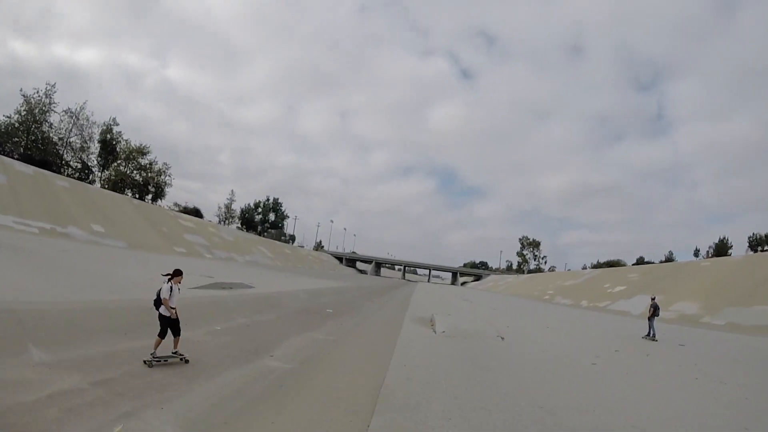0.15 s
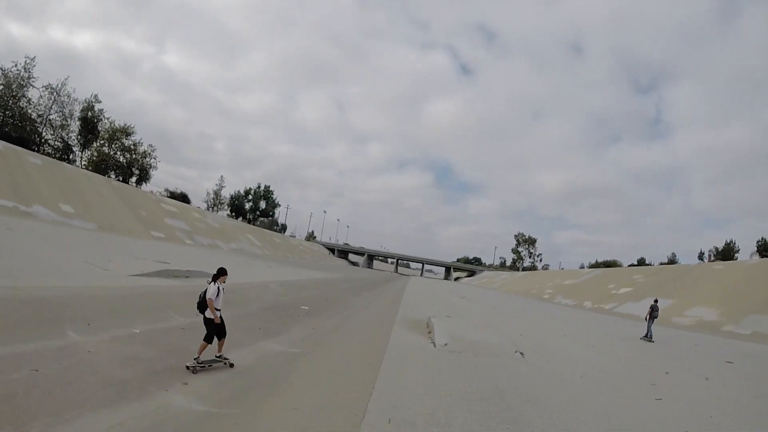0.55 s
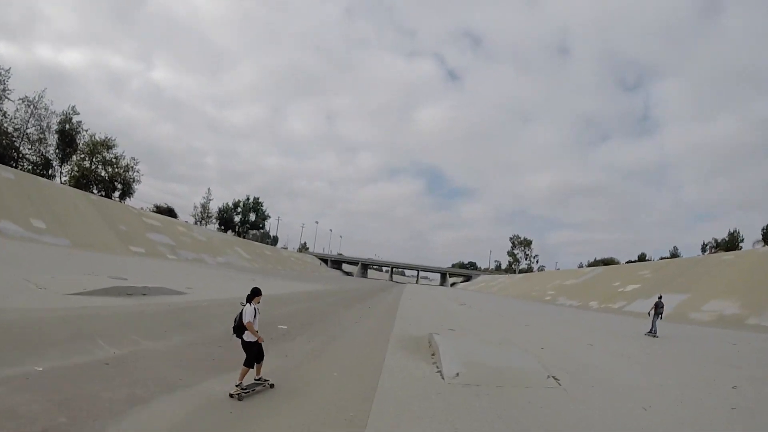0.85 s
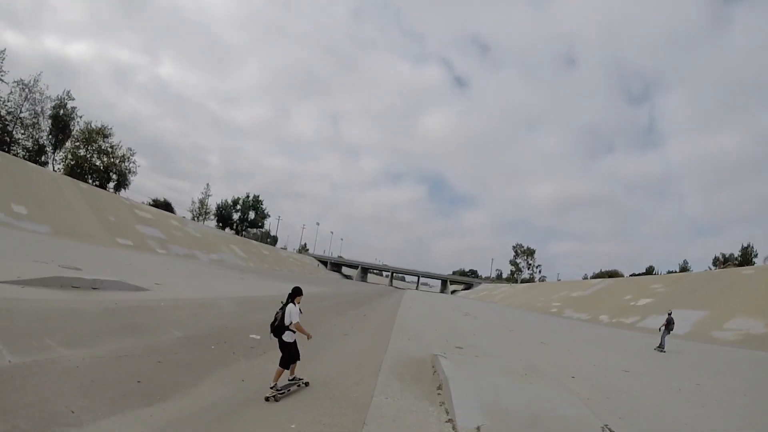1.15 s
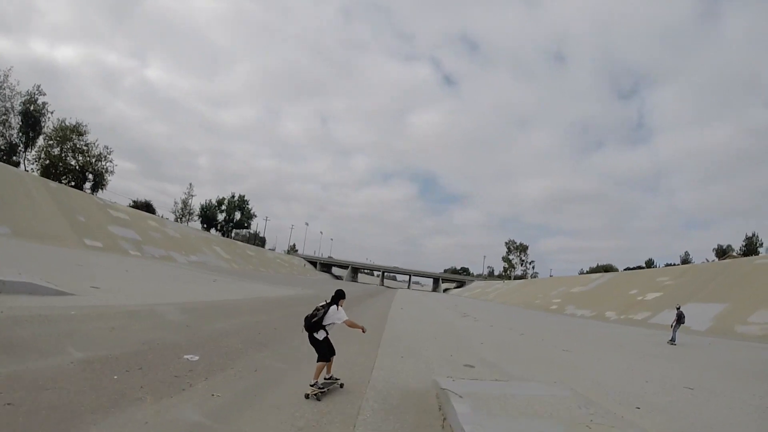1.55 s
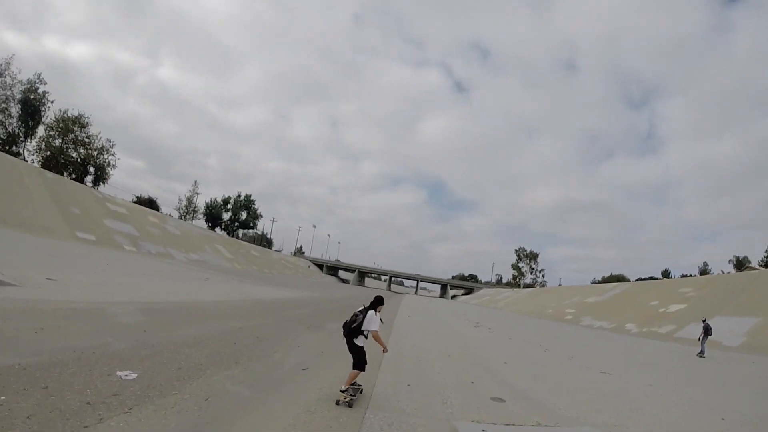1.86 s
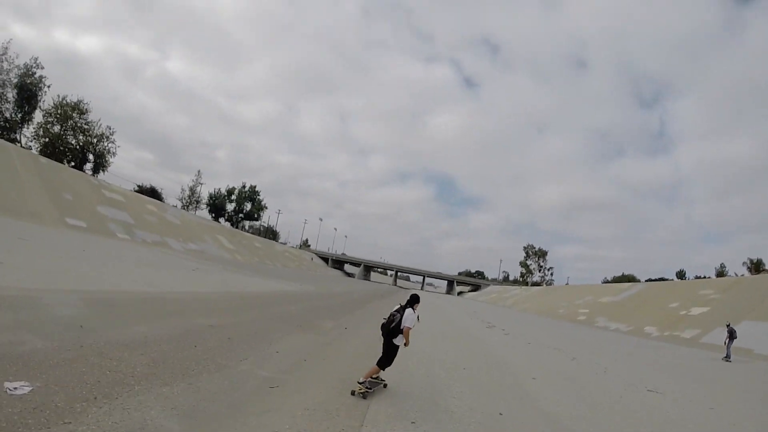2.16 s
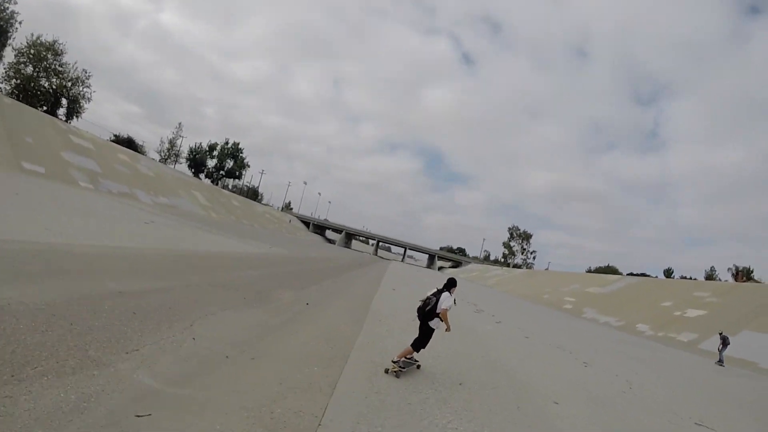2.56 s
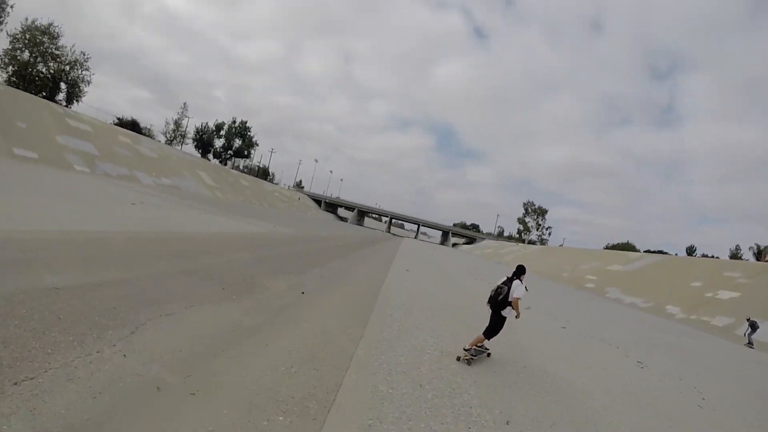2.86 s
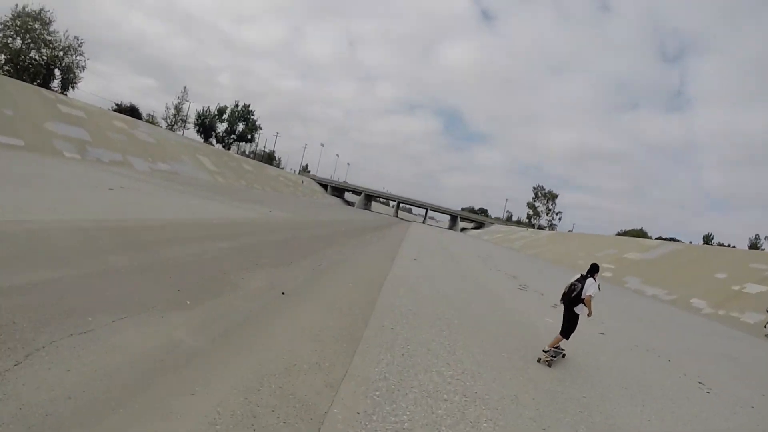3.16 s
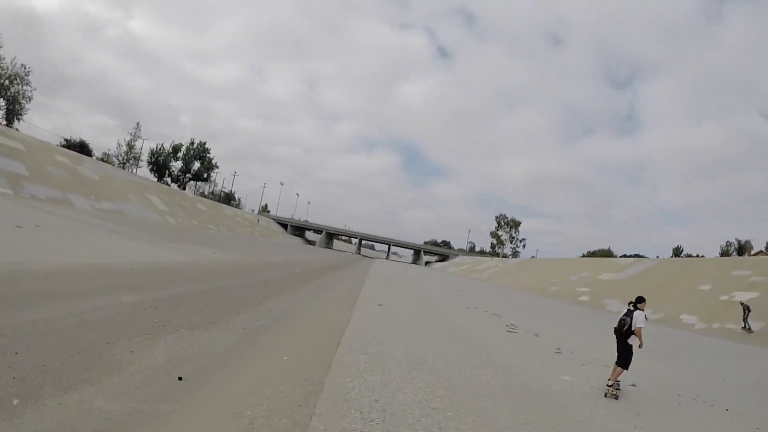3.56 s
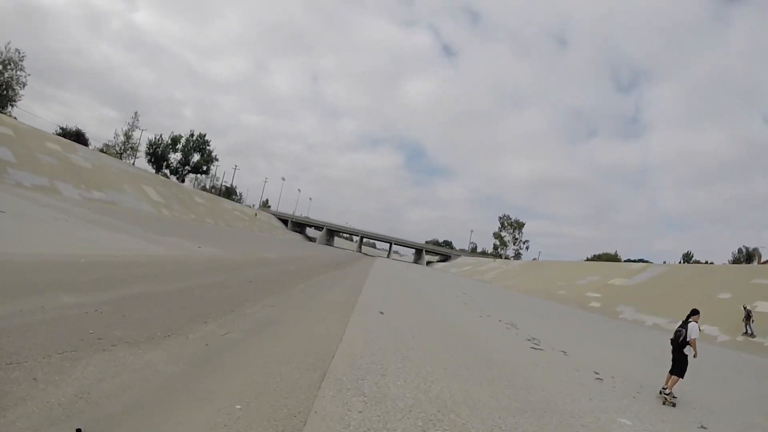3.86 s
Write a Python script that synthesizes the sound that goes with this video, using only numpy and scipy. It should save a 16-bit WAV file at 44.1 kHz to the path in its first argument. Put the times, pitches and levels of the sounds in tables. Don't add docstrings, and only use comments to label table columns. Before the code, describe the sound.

A skateboard rolls continuously over open concrete, close to a microphone riding along. Until about 1.7 s it is a fairly smooth, low rumble with soft deck jolts, dull wheel thuds and slight wind buffeting. Then the surface gets rougher: pebbles knock, loose truck metal rattles, and bearings hiss and whistle faintly. Two deep booms at 2.67 and 2.79 s mark a seam; rough, rattling rolling continues to 4 s.

```python
import sys
import numpy as np
from scipy import signal
from scipy.fft import rfft, irfft
from scipy.io import wavfile

SR = 44100
rng = np.random.default_rng(int(sys.argv[2]) if len(sys.argv) > 2 else 0)


def persist_wave(psi):
    counts = np.round(np.clip(psi, -1, 1) * 32767).astype(np.int16)
    wavfile.write(sys.argv[1], SR, np.atleast_2d(counts).T)


def invert_db(x):
    u = np.asarray(x, float) / 20
    return 10 ** u


N = 176400


def rms_one(x):
    return x / np.sqrt(np.mean(x ** 2) + 1e-20)


def in_time(rows):
    s, *columns = np.transpose(rows)
    return [np.interp(np.arange(N) / SR, s, c) for c in columns]


def drift(rate_hz):
    r = np.exp(-2 * np.pi * rate_hz / SR)
    wander = signal.lfilter([1], [1, -2 * r, r * r], rng.standard_normal(N + SR))
    return rms_one(wander[SR:])


def resonance(x, hz, width_hz):
    r = np.exp(-np.pi * width_hz / SR)
    poles = [1, -2 * r * np.cos(2 * np.pi * hz / SR), r * r]
    return signal.lfilter([(1 - r * r) / 2, 0, (r * r - 1) / 2], poles, x)


def steep_resonance(x, hz, width_hz, widening=2):
    return resonance(resonance(x, hz, width_hz), hz, widening * width_hz)


def grains(per_s, spread_db):
    sizes = invert_db(spread_db * np.minimum(rng.exponential(1, N), 4)) * rng.choice([-1, 1], N)
    return rms_one(sizes * (rng.random(N) < per_s / SR))


def coloured(x, points):
    hz, db = np.transpose(points)
    f = np.maximum(np.arange(N // 2 + 1) * SR / N, 1)
    tilt = invert_db(np.interp(np.log(f), np.log(hz), db))
    low_cut = (f / hz[0]) ** 2 / (1 + (f / hz[0]) ** 2)
    return irfft(rfft(x) * tilt * low_cut, N)


def rolling(coarse_db, roar_db):
    # start in seconds, peak in dB, brightness in dB.
    pebbles = [(0.065, -53, -12), (0.1014, -40.5, -9), (0.2754, -36, -2.5), (1.752, -33.5, 1.5),
               (1.921, -43.5, -2), (2.0409, -31, -6), (2.0757, -26.5, -2), (2.2116, -30, -1),
               (2.2725, -32, -2.5), (2.5142, -46, -2), (2.5557, -29, -2), (2.6451, -36, -3),
               (2.7202, -38, -1), (2.7533, -35, 9), (2.8568, -29.5, -13), (2.878, -23, -8),
               (2.907, -30, -4), (2.923, -36.5, 12), (3.0221, -37, -2), (3.3754, -44, 1.5),
               (3.519, -38, -16), (3.5601, -28.5, -5), (3.5841, -35, -2), (3.691, -30.5, -4),
               (3.7266, -37, 6), (3.8008, -36.5, 6), (3.8307, -34, -6), (3.8528, -31.5, -1),
               (3.914, -39, 6)]
    # frequency in Hz, level in dB.
    roll_colour = [(110, -13), (170, -17.5), (900, -23.5), (2900, -33), (3700, -43), (7200, -54.5),
                   (7700, -54), (14500, -59.5)]
    # pitch in Hz, width in Hz, level in dB.
    body_modes = [(193.2, 62.7, -9), (347, 53.3, -8), (453, 136, -9), (560.5, 92, -22), (802, 100, -29.5),
                  (1640, 240, -22), (2537, 323, -24), (3266, 365, -34), (4285, 380, -36),
                  (4926, 210, -38.5), (5570, 590, -37), (6950, 900, -45), (9150, 1360, -52),
                  (12100, 870, -64)]
    pebble_db, pebble_t60_s = 11, 0.039
    grains_per_s, grain_spread_db, grain_db = 1500, 5, -8
    roll_db, rumble_follows, rumble_split_hz = 8.3, 0.24, 330

    flutter_db = drift(51)
    layers = []
    for _ in range(4):
        coarse_grains = grains(grains_per_s * invert_db(3 * drift(12)), grain_spread_db)
        shake = rng.standard_normal(N) + invert_db(grain_db) * coarse_grains
        layers.append(shake * invert_db(flutter_db + 0.5 * drift(8.5)))

    t = np.arange(int(.04 * SR)) / SR
    scuffs = rng.standard_normal((len(pebbles), len(t)))
    knocks = np.zeros((2, N))
    for (s, db, bright_db), scuff in zip(pebbles, scuffs):
        i = int(s * SR)
        knock = invert_db(pebble_db + db - coarse_db[i] - 14 - 60 * t / pebble_t60_s) * scuff
        knocks[:, i:i + len(t)] += knock * invert_db([[0], [bright_db]])

    wheels = layers[0] + .5 * knocks[0]
    trucks = layers[1] + knocks[0]
    case = layers[2] + knocks[1]
    body = invert_db(roar_db) * coloured(layers[3] + 0.083 * knocks[1], roll_colour)
    for k, (hz, width_hz, db) in enumerate(body_modes):
        source = wheels if k < 4 else trucks if k < 8 else case
        body = body + (-1) ** k * invert_db(db) * steep_resonance(source, hz, width_hz, 3)

    low = signal.sosfilt(signal.butter(2, rumble_split_hz, fs=SR, output="sos"), body)
    swing_db = (rumble_follows - 1) * (coarse_db - coarse_db.mean())
    return invert_db(roll_db + coarse_db) * rms_one(body + low * (invert_db(swing_db) - 1))


def deck_hum(hz, width_hz):
    return rms_one(steep_resonance(rng.standard_normal(N + SR), hz, width_hz)[SR:])


def deck(coarse_db):
    # start in seconds, peak in dB, deck pitch in Hz, length in seconds.
    jolts = [(0.016, -21, 76.8, 0.12), (0.086, -29, 76, 0.11), (0.148, -21.5, 78.6, 0.14),
             (0.411, -25, 73, 0.12), (0.468, -18, 80, 0.1), (0.516, -16.5, 72, 0.079),
             (0.714, -24, 73.7, 0.093), (1.098, -22, 81.7, 0.13), (1.188, -20, 75.1, 0.14),
             (1.238, -19.5, 74.3, 0.07), (1.336, -17.5, 71, 0.074), (1.551, -22.5, 75.3, 0.088),
             (1.643, -15.5, 76, 0.086), (1.805, -20, 78.5, 0.082), (2.053, -15, 73.6, 0.11),
             (2.165, -9.5, 74, 0.091), (2.278, -14.5, 74.2, 0.15), (2.452, -10.5, 72, 0.065),
             (2.509, -9, 72, 0.074), (2.566, -17, 76, 0.1), (2.915, -14, 72.8, 0.088),
             (3.03, -12.5, 71, 0.1), (3.153, -14.5, 71.4, 0.091), (3.283, -19.5, 72.4, 0.076),
             (3.503, -9.5, 73.5, 0.064), (3.637, -17, 73, 0.11), (3.693, -11.5, 74.2, 0.1),
             (3.861, -17, 69.2, 0.086), (3.933, -15.5, 78.7, 0.12)]
    # time in seconds, level in dB.
    rocking = [(0.03, -44), (0.11, -26), (0.46, -25), (0.51, -43), (0.86, -29), (0.94, -30.5), (1.34, -22),
               (1.42, -35.5), (1.82, -23.5), (2.63, -29), (2.67, -14.5), (3.12, -38), (3.64, -23.5),
               (3.97, -24)]
    # start in seconds, peak in dB, deck pitch in Hz,
    # time until the wheels damp it in seconds.
    seam = [
        (2.666, -4, 71.2, 0.054),
        (2.785, -4.5, 72.6, 0.052),
    ]
    sway_hz, twist_hz = 30.1, 52.3
    jolt_lead_s, jolt_db = 0.02006, -3
    seam_rise_s, seam_t60_s, damp_s = 0.014, .3, 0.012
    sway_jolt_db, twist_jolt_db = -19.5, -14

    bend_db = -29.5 + coarse_db - coarse_db.mean()
    out = invert_db(bend_db) * deck_hum(73.3, 17.7)
    out = out + invert_db(-4 + in_time(rocking)[0]) * deck_hum(sway_hz, 13.7)
    out = out + invert_db(-40) * deck_hum(twist_hz, 16.0)

    t = np.arange(SR // 2) / SR
    for s, db, hz, length_s in jolts:
        i = max(int((s - jolt_lead_s) * SR), 0)
        swell = np.sin(np.pi * np.minimum(t / length_s, 1)) ** 2
        jolt = invert_db(db + jolt_db) * swell * np.sin(2 * np.pi * hz * t)
        out[i:i + len(t)] += jolt[:N - i]

    rise = np.sin(np.pi / 2 * np.minimum(t / seam_rise_s, 1))
    shape = rise * invert_db(-60 * np.maximum(t - seam_rise_s, 0) / seam_t60_s)
    twist = invert_db(twist_jolt_db) * np.cos(2 * np.pi * twist_hz * t)
    sway = invert_db(sway_jolt_db) * np.sin(2 * np.pi * sway_hz * t)
    for s, db, hz, length_s in seam:
        i = int(s * SR)
        held = shape * np.exp(-(np.maximum(t - length_s, 0) / damp_s) ** 2)
        out[i:i + len(t)] += invert_db(db) * held * (np.sin(2 * np.pi * hz * t) + twist - sway)
    return out


def bearings():
    # time in seconds, whistle in dB, inner grit in dB, outer grit in dB.
    load = [(0, -66, -75, -79), (1.2, -65, -84, -84), (1.5, -66, -79, -72.5), (1.8, -69, -66.5, -68),
            (2.35, -64, -71, -68), (2.6, -59, -66, -70), (2.78, -64, -60.5, -75), (2.83, -56.5, -66, -66),
            (3.17, -56, -66.5, -66), (3.4, -56, -65, -71), (3.6, -65, -76, -71), (4, -61, -87, -82)]
    # pitch in Hz, width in Hz, level in dB, race (0 inner, 1 outer).
    races = [(8650, 650, -2.5, 0), (11870, 1400, 1.5, 1), (4850, 200, 9, 0), (5380, 660, 6.5, 1),
             (13600, 700, -5, 1)]
    # start in seconds, peak in dB, outer race relative to inner in dB.
    cracks = [(1.7335, -40, 1), (1.7854, -44, -10), (1.8173, -43, -8), (1.879, -40, -12), (1.9221, -51, -4),
              (1.9929, -44, 0), (2.0388, -52, -4), (2.0827, -43, -1.5), (2.1092, -45, -8),
              (2.2638, -38, -14), (2.3571, -49, -4), (2.5342, -43, -8), (2.6879, -43, 3), (2.81, -48, -1),
              (2.8754, -63, 0), (2.9228, -49, -5), (3.149, -42, -6), (3.711, -62, -3), (3.8507, -55, -3),
              (3.9415, -46, 0)]
    # pitch in Hz, level in dB.
    tones = [(12048, -91), (14025, -97), (14086, -88)]
    grit_per_s, grit_spread_db, grit_level_db = 900, 7.5, -5.5
    crack_s, crack_level_db, crack_broad_db = 0.014, -19.5, -29

    whistle_db, *grit_db = in_time(load)
    whistle = steep_resonance(rng.standard_normal(N), 6724, 210)
    out = invert_db(whistle_db - 6) * rms_one(whistle)

    grit = []
    for _ in grit_db:
        clicks = grains(grit_per_s * invert_db(2.0 * drift(9.1)), grit_spread_db)
        grit.append(rms_one(clicks + 0.89 * rng.standard_normal(N)))
    for hz, width_hz, db, race in races:
        k = int(race > .5)
        hiss = rms_one(steep_resonance(grit[k], hz, width_hz))
        out = out + invert_db(grit_db[k] + grit_level_db + db) * hiss

    t = np.arange(int(.03 * SR)) / SR
    swell = np.sin(np.pi * np.minimum(t / crack_s, 1)) ** 2
    bursts = rng.standard_normal((len(cracks), len(t)))
    for (s, db, outer_db), burst in zip(cracks, bursts):
        i = int(s * SR)
        crack = invert_db(crack_broad_db) * np.diff(burst, prepend=0)
        for (hz, width_hz, *_), gain_db in zip(races, (0, outer_db)):
            crack = crack + invert_db(gain_db) * steep_resonance(burst, hz, width_hz)
        out[i:i + len(t)] += invert_db(db + crack_level_db) * swell * rms_one(crack)

    for hz, db in tones:
        out = out + invert_db(db) * np.sin(2 * np.pi * hz * np.arange(N) / SR)
    return out


def wind():
    port = signal.butter(2, [15, 49], "band", fs=SR, output="sos")
    air = signal.sosfilt(port, rng.standard_normal(N))
    gust_db = 4.5 * drift(1.15)
    return invert_db(-40.5 + gust_db) * rms_one(air)


def rings(events, level_db, rise_s, t60_s, partner_db, pair_hz):
    out, t = np.zeros(N + SR), np.arange(SR // 10) / SR
    shape = (1 - np.exp(-t / rise_s)) * invert_db(-60 * t / t60_s)
    shape = shape / shape.max()
    phases = rng.uniform(0, 2 * np.pi, (len(events), 2))
    for (s, db, hz), phase in zip(events, phases):
        i = int(s * SR)
        tone = np.sin(2 * np.pi * hz * t + phase[0])
        partner = np.sin(2 * np.pi * (pair_hz - hz) * t + phase[1])
        out[i:i + len(t)] += invert_db(db + level_db) * shape * (tone + invert_db(partner_db) * partner)
    return out[:N]


def wheel_thuds():
    # start in seconds, peak in dB, pitch in Hz.
    thuds = [(0.374, -27, 371), (0.541, -32.5, 339), (0.706, -34, 350), (0.998, -27.5, 433),
             (1.235, -30, 462), (1.392, -26.5, 350), (1.503, -33.5, 347), (1.578, -31, 441),
             (1.626, -27, 401), (1.663, -25.5, 383), (1.723, -28.5, 420), (1.879, -23.5, 360),
             (2.035, -22, 442), (2.171, -23, 448), (2.231, -26, 316), (2.327, -31.5, 462),
             (2.413, -38, 458), (2.492, -30, 354), (2.632, -33, 360), (2.766, -28.5, 502),
             (2.851, -32, 391), (2.913, -31, 374), (3.231, -33, 382), (3.365, -27, 424), (3.551, -25, 433),
             (3.951, -27, 352)]
    return rings(thuds, level_db=-6.5, rise_s=0.0047, t60_s=0.081, partner_db=-9.5, pair_hz=820.6)


def truck_rattles():
    # start in seconds, peak in dB, ringing pitch in Hz.
    rattles = [(1.139, -37, 2550), (1.717, -38, 1554), (1.752, -39, 2554), (1.9207, -36.5, 2500),
               (2.0397, -29.5, 1630), (2.0771, -32.5, 2610), (2.1019, -51, 2640), (2.2105, -30, 1625),
               (2.2725, -35, 1594), (2.295, -35, 2410), (2.3288, -38, 2560), (2.5127, -30.5, 1630),
               (2.5559, -35.5, 2504), (2.6444, -33, 1655), (2.6585, -32, 1260), (2.695, -36.5, 2580),
               (2.7198, -36, 1413), (2.755, -31, 2500), (2.776, -39.5, 1010), (2.8392, -32, 1600),
               (2.8569, -31.5, 2380), (2.8773, -27.5, 1605), (2.889, -42, 2540), (2.909, -30, 1690),
               (3.0226, -38.5, 1605), (3.112, -39, 1650), (3.161, -36.5, 1710), (3.2807, -41, 2650),
               (3.3255, -39, 1640), (3.3745, -36, 1590), (3.5182, -34, 1530), (3.5611, -48, 2430),
               (3.581, -33, 1580), (3.6445, -34, 1520), (3.689, -39, 1640), (3.7288, -29.5, 1660),
               (3.801, -37, 1694), (3.8307, -35, 1640), (3.8502, -32, 1547), (3.9157, -34, 1670)]
    return rings(rattles, level_db=-8, rise_s=.002, t60_s=0.059, partner_db=-7.5, pair_hz=4380)


def scene():
    # time in seconds, rolling level in dB,
    # broad roar relative to the ringing in dB.
    concrete = [(0, -46, 3), (.5, -49, 6.5), (1.0, -49, 5), (1.45, -49, 5.5), (1.8, -46.5, 0),
                (1.95, -43.5, 1.5), (2.1, -42.5, 1), (2.3, -43.5, -0.5), (2.42, -44.5, -0.5),
                (2.62, -44, -4.5), (2.78, -42.5, -1), (2.93, -44, -3), (3.1, -46, -1.5), (3.27, -46, -1),
                (3.4, -44, 0.5), (3.55, -44, -1), (3.75, -44.5, 1.5), (4, -44, -3.5)]
    coarse_db, roar_db = in_time(concrete)
    ride = rolling(coarse_db, roar_db) + deck(coarse_db) + bearings() + wind()
    return (ride + wheel_thuds() + truck_rattles())[None]


def top_cut(x):
    return signal.sosfilt(signal.butter(12, 15110, fs=SR, output="sos"), x)


def record(dry):
    top = signal.sosfiltfilt(signal.butter(8, 14000, "high", fs=SR, output="sos"), dry)
    sag_db = 12 * np.maximum(drift(25), 0) ** 2
    sagging = dry + top * (invert_db(-sag_db) - 1)
    mix = signal.sosfilt(signal.butter(6, 14200, fs=SR, output="sos"), sagging)
    return top_cut(mix)


dry = scene()
out = record(dry)
persist_wave(out)
```